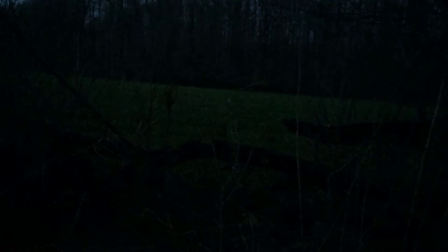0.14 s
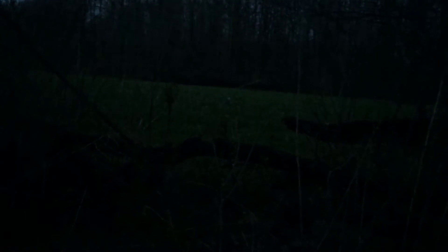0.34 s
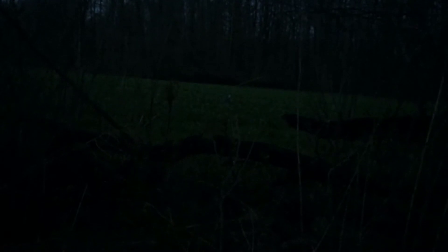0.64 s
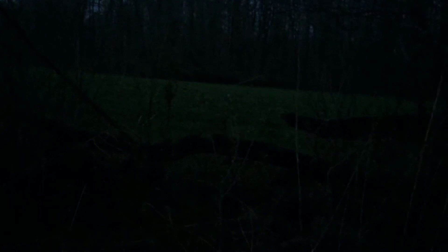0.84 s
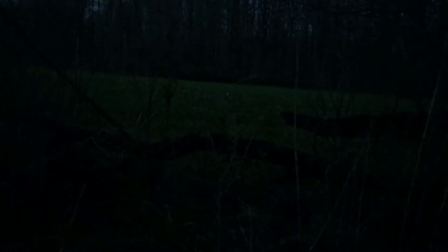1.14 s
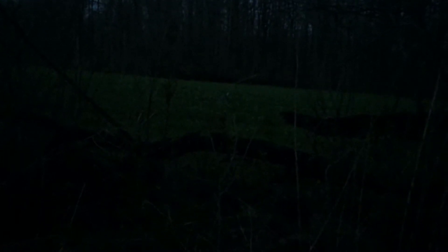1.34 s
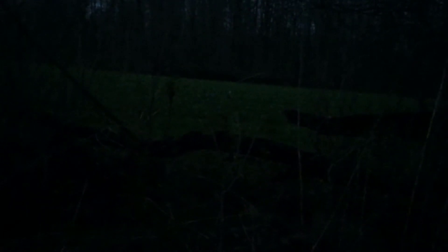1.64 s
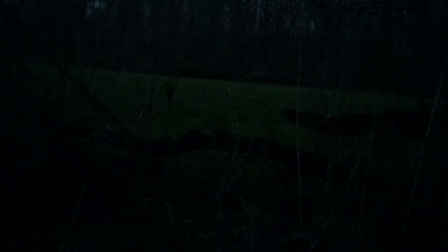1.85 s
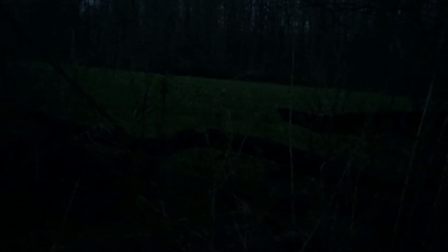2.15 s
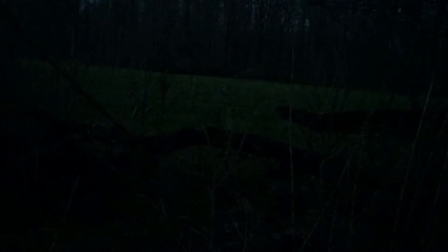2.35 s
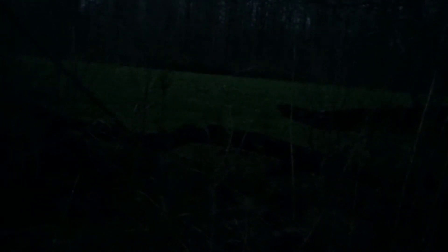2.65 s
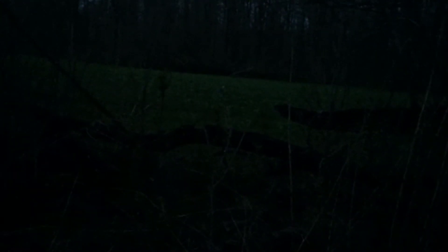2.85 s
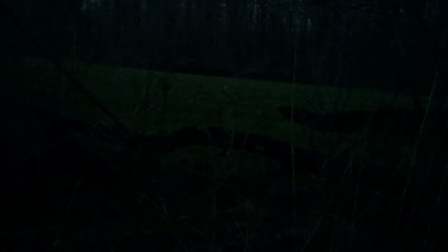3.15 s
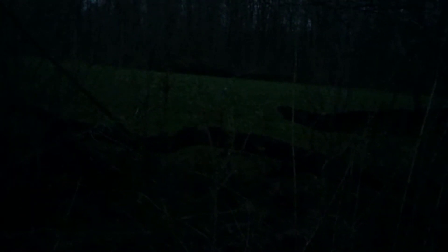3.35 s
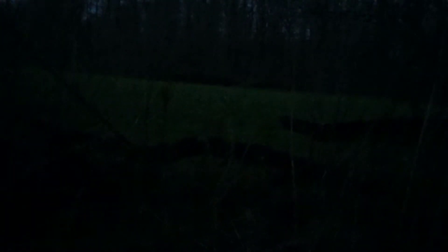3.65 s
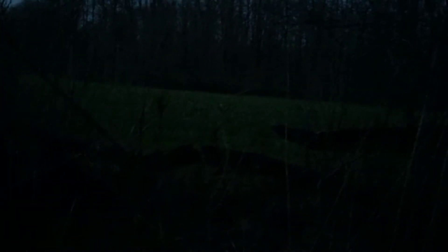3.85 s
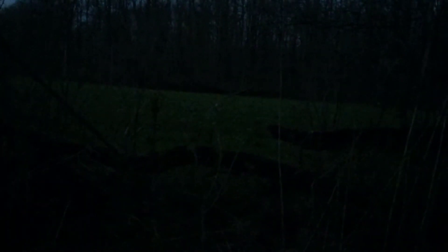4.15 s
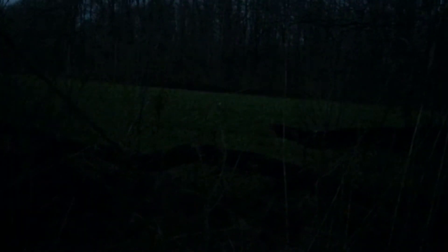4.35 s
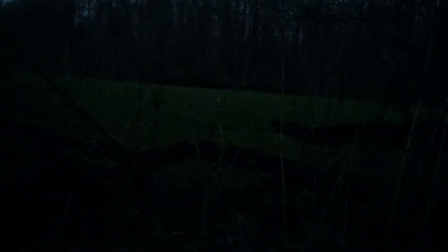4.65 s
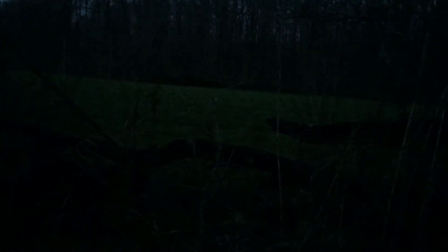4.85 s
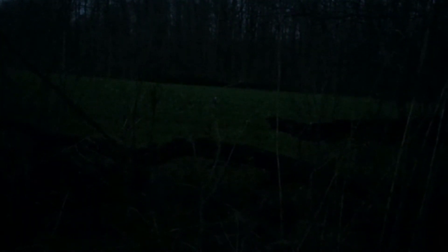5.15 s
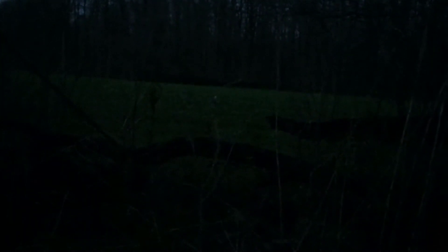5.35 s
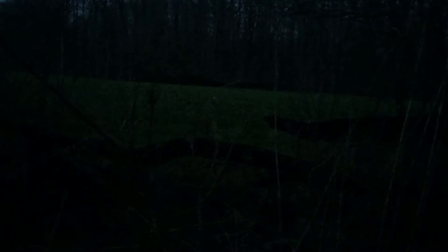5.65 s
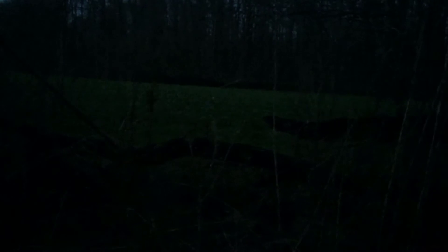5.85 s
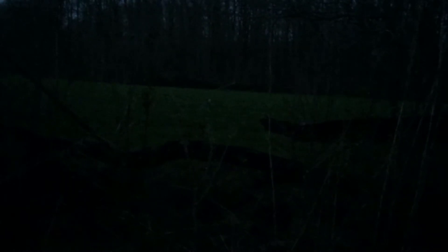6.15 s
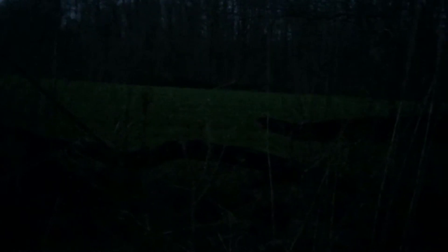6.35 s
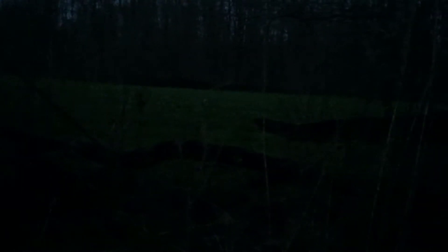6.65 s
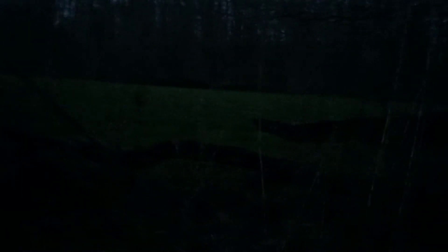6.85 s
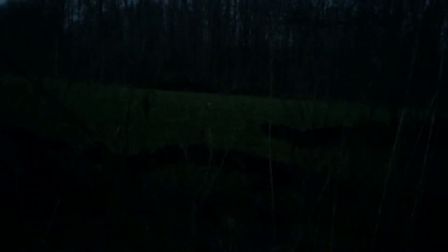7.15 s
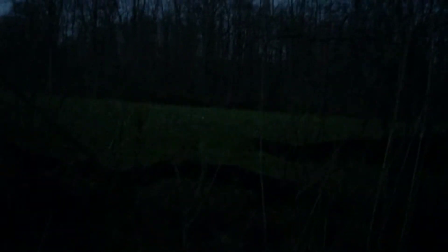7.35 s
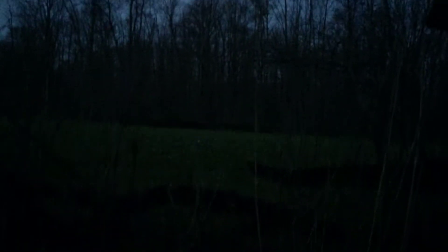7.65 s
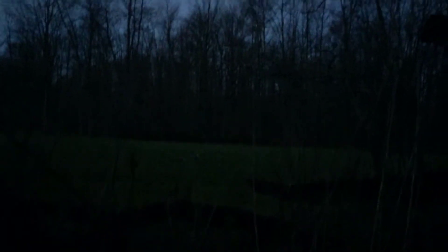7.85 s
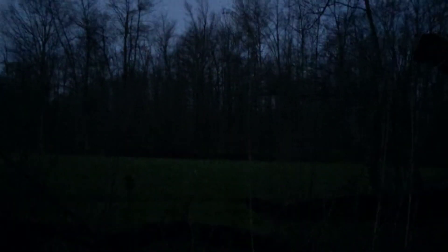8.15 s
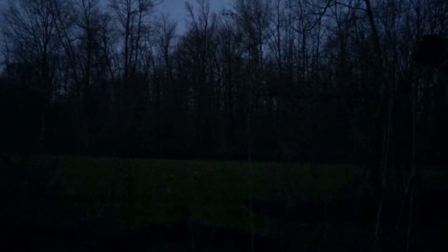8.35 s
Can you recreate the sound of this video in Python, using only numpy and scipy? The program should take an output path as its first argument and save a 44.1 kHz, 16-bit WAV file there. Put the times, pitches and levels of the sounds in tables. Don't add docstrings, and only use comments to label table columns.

```python
import sys
import numpy as np
from scipy import signal
from scipy.fft import rfft, irfft
from scipy.io import wavfile
from scipy.ndimage import uniform_filter1d

SR = 44100
rng = np.random.default_rng(int(sys.argv[2]) if len(sys.argv) > 2 else 0)


def wav_record(signal):
    frames = np.transpose(np.atleast_2d(signal))
    bounded = np.clip(frames, -1, 1)
    quanta = np.round(bounded * 32767).astype(np.int16)
    wavfile.write(sys.argv[1], SR, quanta)


def ratio_of_db(decibels):
    return 10 ** (np.asarray(decibels, float) / 20)


N = 374850
T = np.arange(N) / SR
IDLE = 1e-9 * np.cos(2 * np.pi * 1000 * T)


def at_hz(points, hz):
    return np.interp(np.log(hz), np.log(np.array(points)[:, 0]), np.array(points)[:, 1])


def coloured(points):
    hz = np.maximum(np.arange(N // 2 + 1) * SR / N, 1)
    x = irfft(rfft(rng.standard_normal(N)) * ratio_of_db(at_hz(points, hz)), N)
    return x / x.std()


def drift(rate):
    return np.interp(T * rate, np.arange(200), rng.standard_normal(200))


def add(out, start_s, x):
    at = round(start_s * SR) + np.arange(len(x))
    inside = (at >= 0) & (at < N)
    out[at[inside]] += x[inside]


def whistle(hz_path, length, level_db, edge=.15, swing_hz=0., rate=1., burr=0., rough_db=3.0, swell=0.):
    t = np.arange(round(length * SR)) / SR
    wander = np.interp(t * 200, np.arange(120), np.cumsum(rng.normal(0, .04 * rough_db, 120)))
    flutter = np.interp(t * 400, np.arange(240), rng.standard_normal(240))
    turn = 2 * np.pi * rate * t + wander
    hz = np.interp(t / length, np.linspace(0, 1, len(hz_path)), hz_path)
    hz = hz + swing_hz * (1 + 0.059 * rough_db * flutter[::-1]) * np.sin(turn)
    shape = np.clip(np.minimum(t, length - t) / (edge * length), 0, 1)
    shape = shape * (1 - burr * np.cos(turn / 2) ** 2)
    phase = 2 * np.pi * np.cumsum(hz) / SR
    tone = np.sin(phase) + .014 * np.sin(2 * phase)
    return ratio_of_db(level_db + rough_db * flutter + swell * (t / length - 0.5)) * shape * tone


def woods(x, t60, cut_hz, delay=0.0048, rise=0.0019):
    t = np.maximum(np.arange(SR) / SR - delay, 0)
    echoes = rng.standard_normal(SR) ** 3 * ratio_of_db(-60 * t / t60) * (1 - np.exp(-t / rise))
    echoes = signal.lfilter([1], [1, -np.exp(-2 * np.pi * cut_hz / SR)], echoes)
    return signal.fftconvolve(x, echoes / np.linalg.norm(echoes))[:N]


# start_s, length_s
CLUCKS = [(4.818, 0.0655), (5.138, 0.0539), (5.479, 0.06323), (5.714, 0.05165), (6.039, 0.06),
          (6.324, 0.0545)]
CLUCK_STEPS_S = [0, .002, .006, .010, .018, .026, .034, .042, .050, .062]
TENSIONS = [(860, 880, 905, 828, 765, 705, 648, 598, 570), (1116, 1050, 880, 755, 645, 526, 425, 395, 400),
            (1102.5, 900, 915, 825, 750, 705, 660, 635, 440),
            (1187, 1050, 990, 840, 705, 595, 470, 440, 430),
            (1200, 1030, 965, 860, 750, 665, 580, 480, 660), (1144, 985, 895, 795, 700, 635, 535, 490, 480)]
EFFORTS = [(-17.5, -3.5, 4, 2.5, 2.5, 2.5, 2.5, 2.5, 2.5), (-23, -6.5, -2, 0.1, 0.1, 0.1, 0.1, 0.1, 0.11),
           (-17, -3.5, 0.28, .4, .4, .4, .4, .4, .4), (-15.5, -0.63, 3, 2.5, 2.5, 2.5, 2.5, 2.5, 2.5),
           (-14.5, 0, 3, 3.5, 5.1, 3.5, 3.8, 3.5, 3.5), (-15.5, 2, 3.5, 3, 3, 3, 3, 3, 3)]
# pitch_hz, level_db
CLUCK_FALL = [(420, -21.5), (560, -16.5), (650, -12), (720, -6), (860, 0)]
# second_overtone_db, third_db, fourth_db, higher_db
MOUTHS = [(-3.5, -0.12, -5, -10.5), (3.5, -0.05, 3, -3.5), (-0.5, 3, 0.53, -8), (-1.45, 3, 2, -1.5),
          (-3, 2, 0.41, -3.5), (-0.6, 3, -1.5, -1)]
# frequency_hz, level_db
THROAT = [(450, -11), (800, -14.5), (950, -15), (1110, -25), (1230, -10), (1370, -8.5), (1450, -4),
          (1800, -9.5), (2000, -1), (2170, 1), (2300, -4), (2420, -20), (2570, -30.5), (2950, -23),
          (3400, -17.5), (3700, -23), (4050, -16), (4700, -43), (6000, -46.5), (8500, -32), (13000, -53.5)]
THROATS_CM = [(8.1, 8.1), (8.1, 8.1), (8.1, 8.2), (8.1, 8.0), (8.1, 8.1), (8.1, 8.1)]
SECOND_CUTS_HZ = [1372, 1120, 1310, 1180, 1293, 1370]
HOARSE_DB = [-17.5, -20.5, -21, -14.5, -15, -17.5]
# start_s, length_s, first_hz, last_hz, level_db
SQUEAKS = [(4.806, .016, 3000, 3060, -42), (4.824, .014, 2740, 2870, -22.5),
           (4.825, .013, 3620, 3300, -12.5), (5.140, .006, 3450, 3520, -22), (5.146, .009, 4300, 3941, -21),
           (5.495, .010, 4120, 3890, -20.5), (5.512, .016, 4200, 4033, -28),
           (5.530, .012, 1500, 1555, -25.5)]


def clucks():
    out = np.zeros(N)
    air_noise = coloured([(700, -30.0), (1500, -11.5), (2200, 12.0), (3800, -1.5), (4800, -12.5),
                          (8500, -20.5), (10500, -16.0), (16000, -38.5)])
    hoarse_noise = coloured([(600, -26.5), (1300, -3), (2600, -5.5), (3500, 2), (4400, -27.5),
                             (10000, -26.5), (16000, -46.5)])
    start_db, release_s, release_db = -24.5, .018, -23.5
    second_drop_db, second_slope_hz = 13.0, 60.
    hoarse_rise_s, hoarse_fall_s = .0015, .004
    throat_cm = 8.1
    k = np.arange(1, 19)[:, None]
    for (s, length), tension, effort, mouth, hoarse_db, throat, cut_hz in zip(
            CLUCKS, TENSIONS, EFFORTS, MOUTHS, HOARSE_DB, THROATS_CM, SECOND_CUTS_HZ):
        t = np.arange(-.012, length, 1 / SR)
        done = np.clip(t / length, 0, 1)
        pitch = uniform_filter1d(np.interp(t, CLUCK_STEPS_S[1:], tension), size=100)
        effort_db = np.interp(t, CLUCK_STEPS_S, [start_db, *effort]) + at_hz(CLUCK_FALL, pitch)
        effort_db = effort_db + np.interp(t, [length - release_s, length], [0, release_db])
        jitter = uniform_filter1d(rng.standard_normal(len(t)), size=40)
        pitch = pitch * (1 + (0.024 + 0.076 * done ** 2) * jitter)
        phase = 2 * np.pi * np.cumsum(pitch) / SR

        waver = uniform_filter1d(rng.standard_normal((18, len(t))), size=150)
        waver_db = np.clip(k - 3, 0, 4) * 17.0 * waver
        second_loss = np.clip((cut_hz - 2 * pitch) / second_slope_hz, 0, 1)
        mouth_db = np.select([k == 2, k == 3, k == 4, k > 4], mouth)
        mouth_db = mouth_db - second_drop_db * (k == 2) * second_loss
        throat_db = at_hz(THROAT, k * pitch * np.interp(done, [0, 1], throat) / throat_cm)
        overtones = ratio_of_db(throat_db + mouth_db + waver_db) * np.cos(k * phase + .6 * k * k)
        tone = overtones.sum(0)

        onset = 1 + 2.5 * np.exp(-np.maximum(t, 0) / 0.0055)
        air = ratio_of_db(-25.5) * onset * air_noise[round(s * SR):][:len(t)] * (1 + np.cos(phase))
        lead_db = 2800.0 * np.minimum(t, 0)
        add(out, s + t[0], ratio_of_db(effort_db + lead_db) * (tone * ratio_of_db(lead_db) + air))
        burst_db = hoarse_db - 10.0 * np.abs(t - .003) / np.where(t < .003, hoarse_rise_s, hoarse_fall_s)
        add(out, s + t[0], ratio_of_db(burst_db) * hoarse_noise[round(s * SR):][:len(t)])
    for s, length, first, last, level_db in SQUEAKS:
        add(out, s, whistle([first, last], length, level_db, .4, rough_db=2.))
    return out


# start_s, level_db
THIN = [
    (-.085, -45),
    (5.856, -49.5),
    (6.292, -45),
    (6.653, -40.5),
]
# start_s, level_db, chip_after_db
MIDDLES = [(0.032, -42.5, -42.5), (6.005, -42.5, -59.5), (6.457, -44.5, -48.5), (6.808, -39.5, -43.5)]


def thin_song():
    out = np.zeros(N)
    high_s = 0.108
    for (s, high_db), (mid_s, mid_db, chip_db) in zip(THIN, MIDDLES):
        high = whistle([6860, 6885, 6885, 6900], high_s, high_db - 1.5, .3, rough_db=1.73, swell=5.0)
        fall = whistle([6880, 6780], .024, high_db - 4.5, .3, rough_db=0.86)
        middle = whistle([3720, 3820, 3800], 0.025, mid_db, 0.3, rough_db=2.05, swell=-3.0)
        chip = whistle([3250, 2950], 0.019, chip_db, 0.25, rough_db=0.77, swell=7.2)
        add(out, s, high)
        add(out, s + high_s + .004, fall)
        add(out, mid_s, middle)
        add(out, mid_s + 0.027, chip)
    return out


# start_s, length_s, level_db
HIGH_BUZZES = [(0.157, .545, -45.5), (6.943, .52, -45.5)]
# start_s, length_s, level_db
LOW_BUZZES = [(.733, 0.2, -47.5), (7.483, .195, -47)]
# frequency_hz, width_hz, level_db
BUZZ_BANDS = [(3300, 510, -3.), (4270, 600, 1), (5026.4, 220, 0), (5620, 420, 3.5), (6680, 260, 2)]


def buzzer():
    out = np.zeros(N)
    low_hz, high_hz, rate = 4700, 6950, 169
    mid = (low_hz + high_hz) / 2
    beak = signal.butter(2, [low_hz + 180.0, high_hz - 350.], "band", fs=SR, output="sos")
    for s, length, level_db in HIGH_BUZZES:
        path = [mid + 250.0, mid + 60., mid, mid, mid, mid]
        buzz = whistle(path, length, level_db, 0.034, (high_hz - low_hz) / 2, rate, 0.42,
                       rough_db=2.0, swell=-2)
        add(out, s, signal.sosfilt(beak, buzz) + 0.32 * buzz)

    low_hz, high_hz, rate = 2900, 4600, 60.3
    mid = (low_hz + high_hz) / 2
    beak = signal.butter(2, [low_hz + 180.0, high_hz - 478.], "band", fs=SR, output="sos")
    for s, length, level_db in LOW_BUZZES:
        path = [mid + 74.9, mid, mid - 120., mid - 300.]
        buzz = whistle(path, length, level_db, 0.034, (high_hz - low_hz) / 2, 3 * rate, 0.42,
                       rough_db=2.38, swell=2.47)
        pulse = 1 + .95 * np.sin(2 * np.pi * rate * np.arange(len(buzz)) / SR)
        fade = ratio_of_db(-11.0 * np.linspace(0, 1, len(buzz)) ** 2)
        add(out, s, signal.sosfilt(beak, buzz * pulse * fade) + 0.32 * buzz)

    out = out + IDLE
    out = out + sum(ratio_of_db(db) * signal.lfilter(*signal.iirpeak(hz, hz / width, fs=SR), out)
                    for hz, width, db in BUZZ_BANDS)
    out = ratio_of_db(-6.0) * signal.sosfilt(signal.butter(8, 7350, fs=SR, output="sos"), out)
    far_trees = ratio_of_db(-18.0) * woods(out, 0.57, 7000, delay=0.0107, rise=.02)
    overtone_band = signal.butter(4, [13400, 15700], "band", fs=SR, output="sos")
    overtone = signal.sosfilt(overtone_band, out ** 2 + 250 * out ** 3)
    bush = .7 * woods(out, .11, 9000)
    return far_trees + .75 * out + ratio_of_db(35.) * overtone + bush


# start_s, level_db
BURRS = [(1.030, -48.5), (1.222, -46.5), (1.422, -46.5), (1.624, -47), (1.835, -48), (7.779, -46),
         (7.974, -46.5), (8.173, -45), (8.378, -47)]
# start_s, level_db
CHIPS = [(1.088, -47.5), (1.285, -48.5), (1.484, -49), (1.688, -48.5), (1.900, -51), (7.836, -47.5),
         (8.034, -46), (8.235, -46), (8.441, -50.5)]
# start_s, level_db
WARBLES = [(1.153, -32), (1.352, -32.5), (1.553, -31.5), (1.767, -34), (7.903, -31), (8.104, -30.5),
           (8.303, -30.5)]


def roller():
    low, high = np.zeros((2, N))
    for s, level_db in BURRS:
        throb = whistle([2227, 2162.5, 2134.8, 2169], 0.0612, level_db - 2.5, 0.18,
                        101.0, 207.87, 0.56, rough_db=4.0)
        upper = whistle([2420, 2370, 2330.8, 2410], 0.0688, level_db - 7.0, 0.29, rough_db=3.0)
        add(low, s - .003, throb)
        add(low, s - .003, upper)
    for s, level_db in CHIPS:
        chip = whistle([2980, 2900, 2700, 2570], 0.0185, level_db, 0.139, rough_db=2.0, swell=18.2)
        add(low, s, chip)
    for s, level_db in WARBLES:
        tick = whistle([4600, 5100], .016, level_db - 23, .3, 500., 330., .5, rough_db=1.5)
        rise = whistle([3560, 3740, 3810], 0.0257, level_db, 1.0, rough_db=0.94, swell=4.0)
        tail = whistle([3830, 3910, 3950], 0.032, level_db - 11.0, 0.224,
                       336.0, 263.0, 0.168, rough_db=3.5)
        add(high, s - .010, tick)
        add(high, s, rise)
        add(high, s + 0.016, tail)
    return low + high + ratio_of_db(-6.5) * woods(high, 0.037, 8200)


# start_s, level_part_s, level_db
SLURS = [(1.691, 0.0406, -53.5), (2.008, 0.0645, -53), (2.262, 0.0548, -53.5), (2.429, 0.0126, -53),
         (2.557, 0.0174, -54), (2.682, 0.0183, -53.5), (2.805, 0.02, -53.5), (2.94, 0.021, -54.5),
         (3.067, 0.0094, -54.5), (3.197, 0.02, -56), (3.335, 0.0172, -57.5)]
# start_s, length_s, first_hz, last_hz, level_db
GLIDES = [(.27, 0.23, 3080, 2900, -67), (.429, 0.16, 2930, 3240, -64), (1.68, 0.16, 2850, 2900, -60),
          (2.062, 0.034, 2800, 2700, -56), (2.16, 0.07, 1900, 2090, -62), (3.105, .04, 2120, 2850, -62.5),
          (3.352, 0.029, 2900, 2198, -59), (.31, 0.15, 2830, 2990, -70.5), (4.63, 0.13, 2970, 3280, -70),
          (4.635, 0.049, 2390, 2240, -58), (2.265, 0.063, 2970, 2335, -60), (2.774, 0.09, 2420, 2170, -57),
          (3.198, 0.063, 3300, 2980, -56), (3.214, 0.072, 2790, 2100, -53.5),
          (3.323, 0.042, 2110, 2384, -58.5), (4.35, .035, 4400, 3731, -56),
          (4.572, 0.05, 2800, 2740, -61.5), (4.565, 0.037, 2410, 1990, -55), (5.01, 0.03, 2140, 2790, -66),
          (6.211, 0.059, 2680, 2810, -61), (7.22, 0.097, 2800, 3082, -60), (7.30, 0.091, 3336, 3105, -57),
          (7.90, 0.05, 2280, 2900, -54), (7.935, 0.046, 2950, 2495, -53.5)]
# start_s, length_s, pitch_hz, level_db
PIPES = [(0.863, 0.037, 6680, -72), (1.44, 0.057, 6700, -73.5), (1.825, 0.098, 3230, -61.5),
         (3.142, 0.0324, 2985, -53.5), (3.66, 0.045, 3270, -73.5), (4.299, 0.051, 2898, -65.5),
         (3.18, 0.063, 3052, -58.5), (3.33, 0.088, 2960, -70), (3.87, 0.082, 3000, -73),
         (4.33, 0.11, 2960, -64.5), (2.77, 0.071, 3330, -67.5), (6.11, 0.048, 2750, -60.5),
         (6.26, 0.0424, 2326, -60.5), (6.68, .06, 3240, -62), (6.7, 0.048, 2810, -57.5),
         (5.043, 0.06, 2980, -58), (6.165, 0.0493, 2370, -56), (6.65, .03, 2773, -59),
         (6.837, 0.0424, 2410, -56), (7.4, 0.07, 3048, -66), (7.715, 0.11, 2834, -56.5),
         (7.748, 0.15, 3260, -71.5)]
# start_s, length_s, level_db
CAROLS = [(2.602, .118, -55.5), (4.461, .112, -55)]
CAROL_HZ = [2190, 2270, 2300, 2330, 2490, 2780, 2830]


def far_birds():
    out = np.zeros(N)
    for s, flat, level_db in SLURS:
        length = flat + .024
        steps = np.arange(0, length, .004)
        path = np.interp(steps, [0, .015, flat + .001, flat + .01, length],
                         [4060 - 1200 * flat, 3950 - 900 * flat, 3940, 3650, 2900])
        slur = whistle(path, length, level_db, 0.266, rough_db=2.2)
        add(out, s, slur * np.linspace(1, .7, round(length * SR)))
    level_notes = [(s, length, hz, hz, db) for s, length, hz, db in PIPES]
    for s, length, first, last, level_db in GLIDES + level_notes:
        path = [first, first + .93 * (last - first), last]
        add(out, s, whistle(path, length, level_db, .25, rough_db=3.2))
    for s, length, level_db in CAROLS:
        add(out, s, whistle(CAROL_HZ, length, level_db, .15, rough_db=2.5, swell=3.0))
    hoarse = whistle([2200, 2130, 2080], 0.065, -51.0, 0.223, 115.0, 124.8, 0.43, rough_db=5.0)
    add(out, 4.064, hoarse)
    blur = np.zeros(N)
    for s, hz, glide, loud in rng.random((140, 4)):
        path = (2850 + 500 * hz) * np.array([1, 0.93 + 0.074 * glide])
        add(blur, 11.0 * s, whistle(path, 0.15, -73 + 3.3 * loud, 0.78, rough_db=5.5))
    return out + woods(blur, 0.926, 6000)


# start_s, peak_db, centre_hz
THUDS = [(2.153, -56, 320), (2.961, -48.5, 259.4), (4.035, -50.5, 310), (4.238, -42, 299),
         (4.665, -55.5, 275), (4.825, -41, 186.6), (7.039, -47.5, 300), (4.93, -52, 197),
         (5.204, -43.5, 200), (5.782, -46, 184.8)]
# start_s, peak_db, centre_hz
TWIGS = [(.092, -50.5, 5870), (.215, -42.5, 1310), (.928, -49.5, 2180), (1.574, -59, 950),
         (2.24, -50.5, 7700), (2.999, -35.5, 1667), (3.72, -55, 4360), (4.215, -43.5, 5450),
         (4.234, -35.5, 1460), (4.319, -45.5, 6760), (4.395, -44.5, 3270), (4.332, -38.5, 4623),
         (7.039, -49, 527), (8.329, -58.5, 500)]
# start_s, peak_db, centre_hz
SNAPS = [(1.144, -42.5, 2270), (1.388, -51, 696), (1.679, -32, 1380), (2.455, -45, 3000),
         (2.989, -31.5, 3030), (3.086, -50, 870), (3.258, -43, 2160)]
# start_s, peak_db, centre_hz
TOCKS = [(.436, -52.5, 2570), (3.933, -44, 2238), (3.94, -52, 4210), (4.135, -61.5, 915),
         (4.318, -45.5, 2119), (4.574, -46.5, 1538), (5.61, -60, 4500), (5.685, -39, 1984),
         (6.025, -35.5, 1915), (6.300, -31.5, 1994), (7.455, -50, 2670), (1.386, -51.5, 1970),
         (1.388, -48.5, 2750), (6.984, -42.5, 2626), (6.984, -45.5, 3880), (.216, -60, 9000),
         (1.679, -47.5, 5750), (1.699, -55.5, 5860), (1.712, -54.5, 5850)]
# start_s, peak_db, centre_hz
SCUFFS = [(.43, -56.5, 8970), (2.226, -45, 5060), (4.085, -45, 1774), (4.351, -50, 5370),
          (4.577, -54, 10500), (5.062, -46, 2384), (5.075, -46, 1900)]
# start_s, peak_db, centre_hz
CRACKS = [(4.203, -46, 11000), (4.215, -48, 11500), (4.239, -43.5, 11460), (4.320, -46, 12000),
          (4.333, -59, 13000), (4.349, -51, 12000), (4.576, -42.5, 11000)]
# start_s, peak_db, centre_hz
KNOCKS = [
    (8.3305, -32, 262.6),
]


def ticks():
    out, t = np.zeros(N), np.arange(2500) / SR
    # contacts, band width in octaves, decay in s
    bodies = [(THUDS, 0.69, 0.0046), (TWIGS, 1.04, 0.0045), (SNAPS, 1.8, 0.0023), (TOCKS, 0.22, 0.0098),
              (SCUFFS, 0.57, 0.01733), (CRACKS, 0.9, 0.0018), (KNOCKS, 1.07, 0.000496)]
    for contacts, octaves, decay in bodies:
        for s, peak_db, hz in contacts:
            low_hz = hz / 2 ** (octaves / 2)
            high_hz = min(hz * 2 ** (octaves / 2), 15000)
            snap = rng.standard_normal(2500) * np.exp(-t / decay)
            snap = snap * (1 - np.exp(-t * low_hz / 0.25))
            band = signal.butter(2, [low_hz, high_hz], "band", fs=SR, output="sos")
            snap = signal.sosfilt(band, snap)
            add(out, s, ratio_of_db(peak_db) * snap / np.abs(snap).max())
    return out


# peak_s, level_db, rise_db_per_s, fall_db_per_s
RUSTLE = [(1.288, -64.5, 598.5, 461), (1.994, -71.5, 131.5, 81), (2.75, -63.5, 94, 55),
          (2.975, -62, 204, 267), (4.226, -57.5, 454, 3000), (5.379, -66.5, 847.5, 499.5),
          (6.598, -67, 251.5, 700.5), (6.77, -63, 76.5, 89.5), (8.234, -60, 153.5, 113)]
# frequency_hz, level_db_per_hz
RUSTLE_COLOUR = [(88, -51), (150, -2.5), (262, -0.5), (1770, -4.5), (2310, -0.5), (3030, -6.5), (3970, -6),
                 (4910, -11), (15000, -24)]


def rustle():
    level = np.zeros(N)
    for s, peak_db, rise, fall in RUSTLE:
        below_db = np.maximum(rise * (s - T), fall * (T - s))
        level += ratio_of_db(peak_db - below_db) * (below_db < 19)
    grain = ratio_of_db(uniform_filter1d(rng.exponential(5.1, N), size=30) - 6.0)
    return ratio_of_db(7.5) * level * grain * coloured(RUSTLE_COLOUR)


# centre_s, level_db, half_length_s
BUMPS = [(0.269, -68.5, 0.097), (0.75, -68, 0.064), (1.252, -66.5, 0.17), (2.096, -69, 0.12),
         (4.835, -58, .06), (5.146, -67, 0.092), (5.554, -58.5, 0.04), (5.755, -52, 0.043),
         (6.054, -49, 0.034), (6.343, -55.5, 0.076), (6.644, -64, 0.22), (7.283, -63, 0.046),
         (7.503, -66, 0.037), (7.811, -65.5, 0.056), (8.293, -68.5, 0.16)]


def rumble():
    wind = ratio_of_db(-69.5 + 5.5 * drift(15.0))
    hand = sum(ratio_of_db(db) * np.exp(-((T - s) / half) ** 2) for s, db, half in BUMPS)
    colour = coloured([(15, -39.0), (40, -4.0), (75, 4.5), (110, 2.0), (170, -20.0), (400, -33)])
    return (wind + hand) * colour


# frequency_hz, level_db_per_hz
AIR = [(15, -44), (25, -23), (74, -2.5), (229, -14.5), (309, -13), (394, -19), (659, -21), (1130, -21),
       (1650, -20.5), (2110, -20), (2760, -20.5), (3250, -18.5), (5280, -27.5), (6050, -28), (16000, -40)]


def open_air():
    return ratio_of_db(-66 + 0.37 * drift(2.1)) * coloured(AIR)


def scene():
    near, far = clucks() + IDLE, far_birds()
    song = thin_song() + buzzer() + roller()
    thrown = signal.sosfilt(signal.butter(2, [1600, 4400], "band", fs=SR, output="sos"), near)
    thrown = thrown - .8 * signal.lfilter(*signal.iirpeak(2000, 2.4, fs=SR), thrown)
    wood = woods(ratio_of_db(-12.0) * song + ratio_of_db(-9.5) * far, 0.38, 6000)
    next_row = ratio_of_db(-50.5) * woods(thrown, .36, 4000, delay=.085, rise=.03)
    tree_line = ratio_of_db(-45.0) * woods(thrown, .8, 4000, delay=.3, rise=.05)
    ground = ratio_of_db(-23.5) * woods(near, 0.069, 4800) + ratio_of_db(-34.0) * woods(thrown, 0.27, 4000)
    birds = near + song + far
    echoes = ground + wood + next_row + tree_line
    return (birds + echoes + ticks() + rustle() + rumble() + open_air())[None]


def top_cut(x):
    return signal.sosfilt(signal.butter(12, 15800, fs=SR, output="sos"), x)


def record(dry):
    rounded = dry / (1 + (dry / .93) ** 4) ** 0.2
    cut = signal.sosfilt(signal.cheby2(12, 60, 16400, fs=SR, output="sos"), rounded)
    return top_cut(cut)


dry = scene()
out = record(dry)
wav_record(out)
```